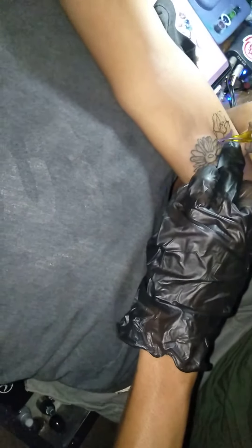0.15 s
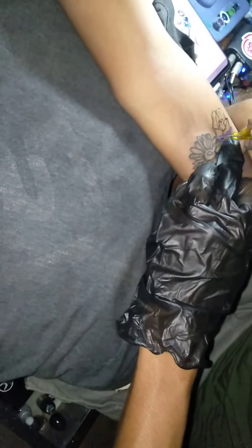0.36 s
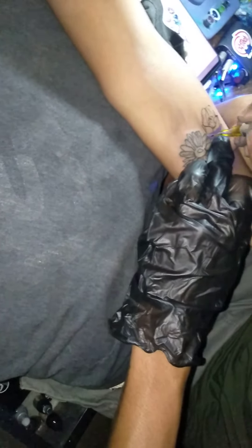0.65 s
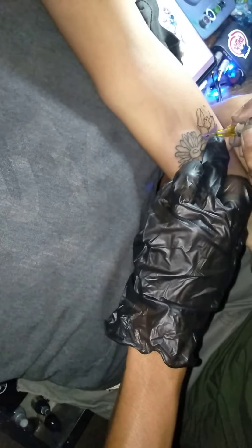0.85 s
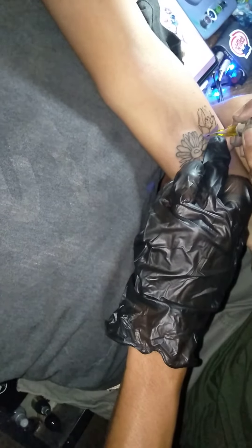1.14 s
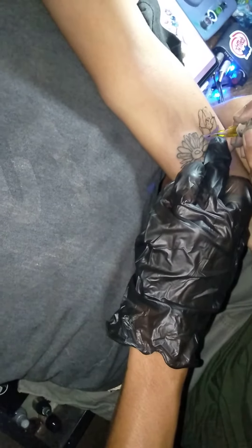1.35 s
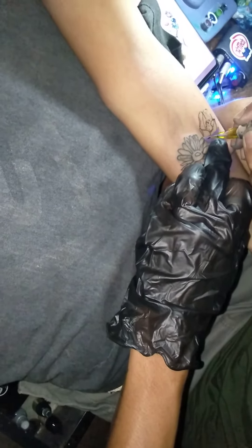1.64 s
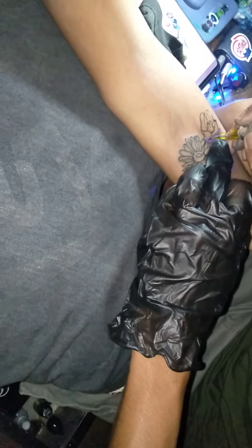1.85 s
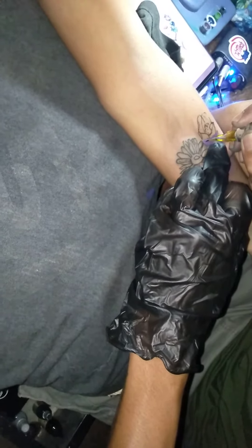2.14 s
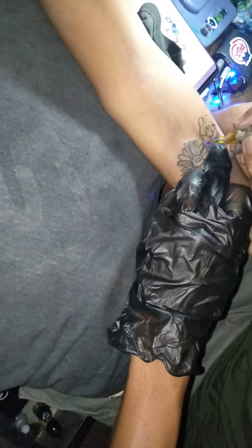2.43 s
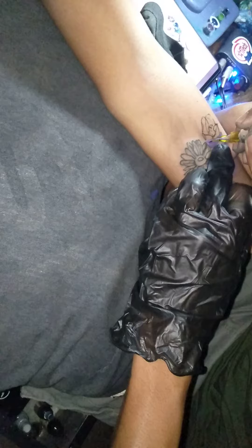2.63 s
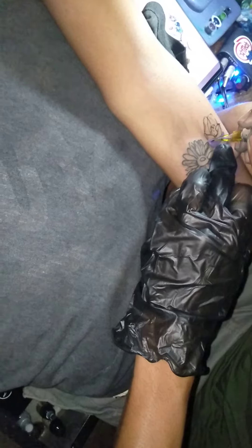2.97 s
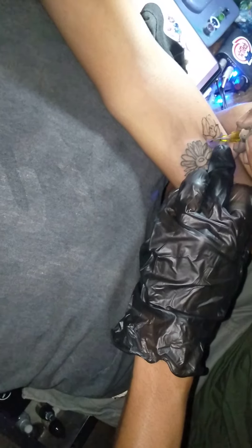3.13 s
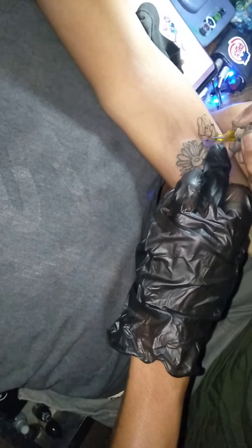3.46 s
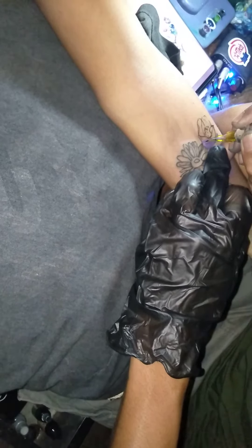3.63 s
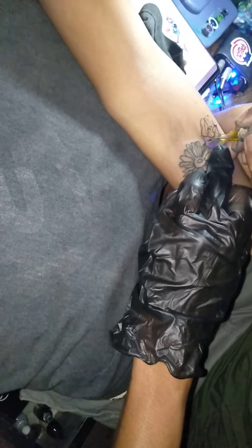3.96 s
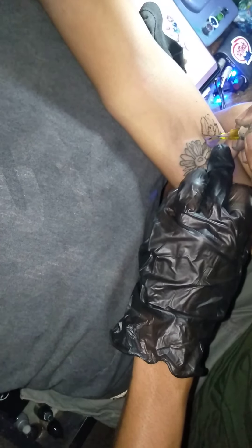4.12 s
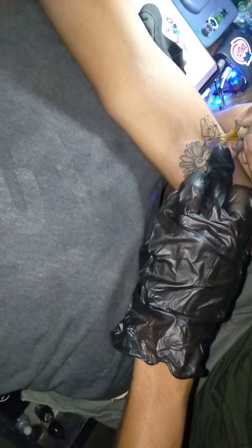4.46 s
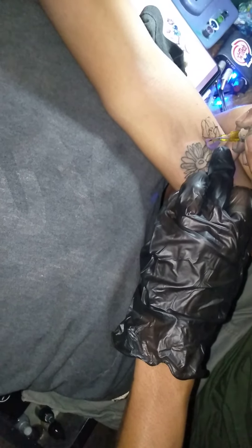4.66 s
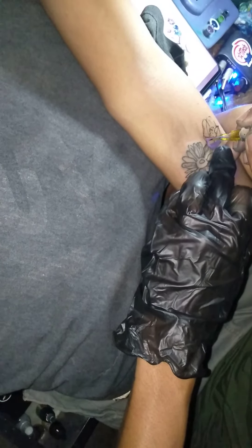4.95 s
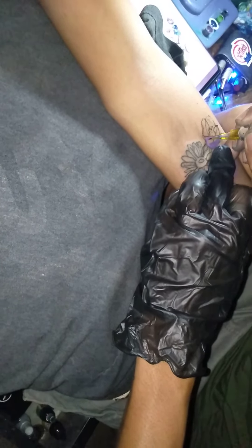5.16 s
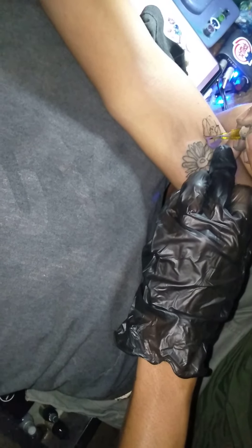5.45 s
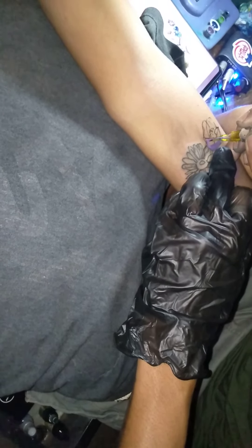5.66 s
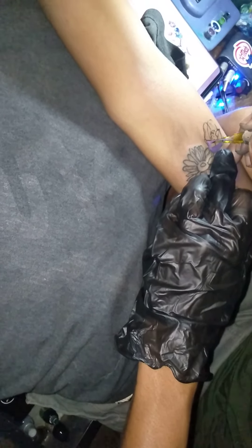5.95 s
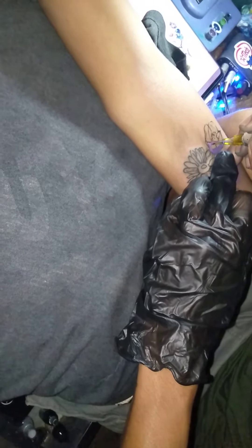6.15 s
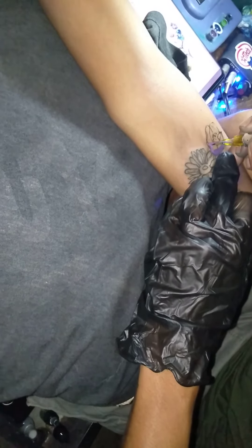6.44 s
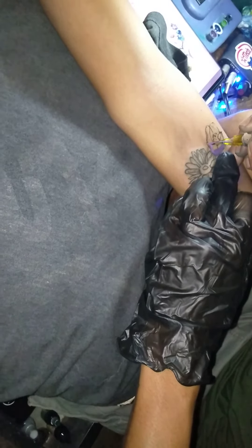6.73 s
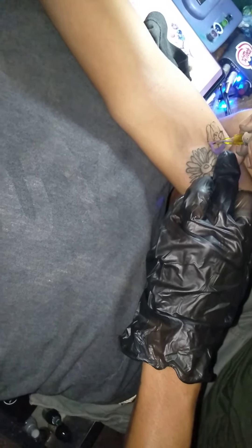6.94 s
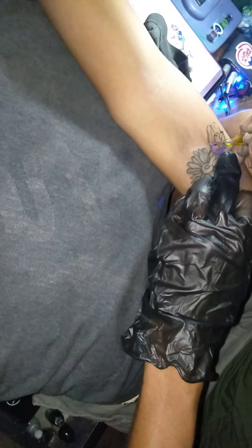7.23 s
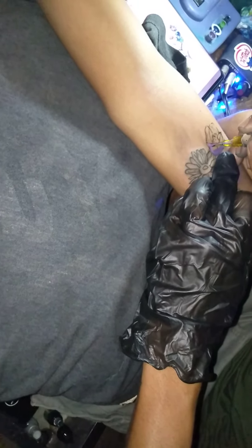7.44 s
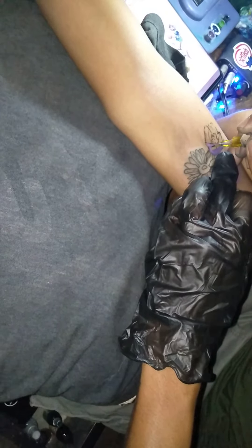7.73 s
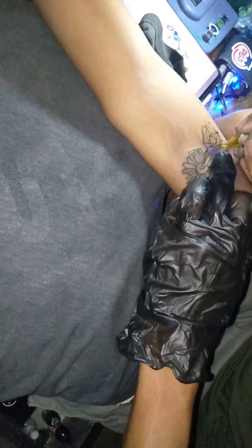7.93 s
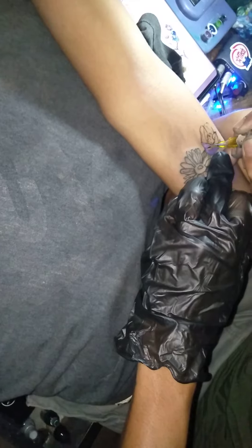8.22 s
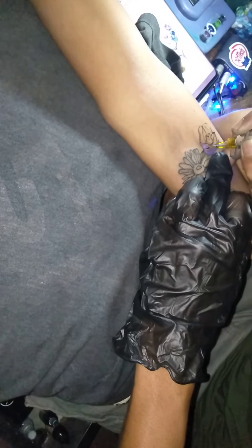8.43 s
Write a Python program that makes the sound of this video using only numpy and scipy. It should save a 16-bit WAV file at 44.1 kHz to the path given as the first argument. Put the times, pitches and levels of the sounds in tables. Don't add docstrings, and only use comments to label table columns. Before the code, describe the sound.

Close to a phone microphone in a small room, a coil tattoo machine gives a tiny burst, drops out while crickets chirp faintly, flutters weakly, then buzzes steadily at a low pitch with bright metallic chatter and electric sizzle. It sags and stutters just after five seconds, recovers stronger and runs to the end. A thin glove crackles occasionally.

```python
import sys
import numpy as np
from scipy import signal
from scipy.fft import rfft, irfft, next_fast_len
from scipy.io import wavfile
from scipy.ndimage import map_coordinates

SR = 44100
rng = np.random.default_rng(int(sys.argv[2]) if len(sys.argv) > 2 else 0)


def waveform_to_disk(signal):
    frames = np.transpose(np.atleast_2d(signal))
    scaled = np.clip(frames, -1, 1) * 32767
    samples = np.round(scaled).astype(np.int16)
    wavfile.write(sys.argv[1], SR, samples)


def voltage_ratio(decibels):
    exponent = np.asarray(decibels, float) / 20
    return 10 ** exponent


N = 378819
TIME = np.arange(N) / SR


def unit(x):
    return x / np.sqrt(np.mean(x ** 2) + 1e-20)


def along(points, hz):
    f, v = np.transpose(points)
    return np.interp(np.log(hz + 1), np.log(f + 1), v)


def curves(rows):
    s, *cols = np.transpose(rows)
    return [np.interp(TIME, s, c) for c in cols]


def wobble(rate):
    return map_coordinates(rng.standard_normal(int(N * rate / SR) + 4), [TIME * rate])


def filtered(x, response):
    m = next_fast_len(N + SR // 2)
    return irfft(rfft(x, m) * response(np.fft.rfftfreq(m, 1 / SR)), m)[:N]


def modes(table, flip=-1):
    def response(f):
        total = 0
        for k, (hz, width, db) in enumerate(table):
            total = total + flip ** k * voltage_ratio(db) * 1j * f * width / (hz * hz - f * f + 1j * f * width)
        return total
    return response


def small(f, edge_hz, order):
    return (1j * f / (edge_hz + 1j * f)) ** order


def noise(response):
    return unit(filtered(rng.standard_normal(N), response))


def pulses(times, sizes):
    at = np.clip(times * SR, 8, N - 9)
    taps = np.floor(at)[:, None] + np.arange(-7, 9)
    gap = taps - at[:, None]
    shape = np.sinc(gap) * np.cos(np.pi * gap / 16) ** 2
    return np.bincount(taps.astype(int).ravel(), (sizes[:, None] * shape).ravel(), N)


def armature():
    # start_s, strength_db, strokes_per_s
    pull = [(0.53, -33, 104.9), (0.64, -32, 105.1), (0.8, -34, 104.4), (1.47, -32, 104.7),
            (1.52, -34, 104.1), (2.55, -32, 104.5), (2.82, -34, 103.5), (2.93, -33, 104.3),
            (3.69, -32, 104.8), (4.41, -35, 103.6), (4.8, -33, 104.2), (5.18, -39, 101.9),
            (5.22, -45, 100.7), (5.29, -40, 102.1), (5.51, -38, 102.2), (5.78, -30, 105.1),
            (7.2, -33, 104.7), (8.59, -31, 105.1)]
    # on_s, off_s, strength_db
    switch = [(0, .097, -1), (.275, .322, -16), (.49, .516, -15), (.5168, 5.04, 0), (5.04, 5.12, -1.5),
              (5.12, 5.19, 0), (5.19, 5.23, -4), (5.23, 5.245, 4), (5.245, 5.28, -1), (5.28, 5.554, 0),
              (5.554, 5.563, -6), (5.563, 8.6, 0)]
    first_slam_s = .5172
    strength_db, speed = curves(pull)
    tremor_db = .6 * wobble(6)
    strength_db = strength_db + tremor_db
    turns = np.cumsum(speed + .3 * tremor_db + 0.1515 * wobble(25)) / SR
    turns += -turns[round(first_slam_s * SR)] % 1
    body_gain, chatter_gain = np.zeros(N), np.zeros(N)
    for on, off, current_db in switch:
        live = (TIME >= on) & (TIME < off)
        body_gain += live * voltage_ratio(strength_db - 18.5 + 1.3 * current_db)
        chatter_gain += live * voltage_ratio(strength_db + current_db)
    return turns, body_gain, chatter_gain


def travel_time():
    spread_ms = 1.201
    late = rng.random(40) * spread_ms / 1000

    def response(f):
        delay = np.interp(f, np.linspace(0, SR / 2, len(late)), late)
        return np.exp(-2j * np.pi * np.cumsum(delay) * f[1])
    return response


def slammed_body(turns, gain, travel):
    # pitch_hz, width_hz, level_db
    body_tones = [(441, 200, -19), (1025, 92, -8), (1405, 146, -10), (1772, 91, -20), (1998, 147, -17),
                  (2354, 143, -10), (2590, 56, -7), (2817, 42, -7), (3000, 78, 2), (3345, 278, -12),
                  (3606, 80, -3), (3901, 80, -9), (4351, 52, -8), (4890, 254, -15)]
    count = np.arange(1, int(turns[-1]))
    chance = rng.standard_normal((len(count), 2))
    times = np.interp(count, turns, TIME) + .009 * chance[:, 0] / 1000
    slams = pulses(times, voltage_ratio(.8 * chance[:, 1]))
    body_lags = 2.285
    return filtered(unit(slams) * gain * voltage_ratio(18.0),
                    lambda f: modes(body_tones, flip=1)(f) * small(f, 554, order=2) * travel(f) ** body_lags)


def contact_chatter(turns, gain, travel):
    # share_of_stroke, ring_db, sizzle_db, scatter_ms
    contacts = [(.0, 9.5, -2.5, 0.01), (.1, -4, -4, .015), (0.209, 6, -4, 0.018), (0.319, 2, -22, 0.025),
                (0.522, -38, 11, 0.033), (0.922, -17, -2, 0.038)]
    # pitch_hz, width_hz, level_db
    frame_tones = [(5170, 625, -3), (5969, 396, 1), (6507, 179, 4), (7154, 226, 1), (7669, 242, 2),
                   (7993, 231, 5), (8396, 683, 1), (9682, 939, -1), (10425, 282, 3), (11017, 204, 7),
                   (11930, 347, 5), (12461, 362, 4), (13493, 550, 4), (14468, 295, 9), (14854, 241, 12),
                   (15576, 365, 12)]
    # pitch_hz, level_db
    sizzle_colour = [(300, -30), (1000, 8), (2500, 25), (3500, 34.5), (4500, 12), (6000, -7), (10000, 0.5),
                     (15700, 3.5)]
    # start_s, end_s
    flutter = (.2, .516)
    burst_ms, steady_sizzle = 0.87, 0.53
    count = np.arange(1, int(turns[-1]))
    taps, sparks = np.zeros(N), np.zeros(N)
    for share, ring_db, sizzle_db, scatter_ms in contacts:
        chance = rng.standard_normal((len(count), 3))
        drift = .006 * wobble(2.5) * (share > 0)
        times = np.interp(count + share, turns + drift, TIME) + scatter_ms * chance[:, 0] / 1000
        taps += pulses(times, voltage_ratio(ring_db + 0.27 * chance[:, 1]))
        sparks += pulses(times, voltage_ratio(sizzle_db + 0.6 * chance[:, 2]))
    burst = np.exp(-TIME[:SR // 100] * 1000 / burst_ms)
    sparks = unit(np.abs(signal.fftconvolve(sparks, burst)[:N])) + steady_sizzle

    def steel(f):
        return modes(frame_tones)(f) * small(f, 4000, order=4)

    frame = filtered(unit(taps) * gain * voltage_ratio(0.5), lambda f: steel(f) * travel(f))
    sizzle = filtered(unit(sparks * rng.standard_normal(N)) * gain * voltage_ratio(-8.5),
                      lambda f: steel(f) * voltage_ratio(along(sizzle_colour, f)))
    weak = (TIME > flutter[0]) & (TIME < flutter[1])
    spring = filtered(weak * (frame + sizzle), lambda f: small(f, 11000, order=3))
    return ~weak * (frame + sizzle) + voltage_ratio(4) * spring


def machine():
    turns, body_gain, chatter_gain = armature()
    travel = travel_time()
    return slammed_body(turns, body_gain, travel), contact_chatter(turns, chatter_gain, travel)


def thinned(x):
    # before_slide_hz, after_slide_hz, width_hz, depth_0_to_1
    dead_spots = [(4260, 4250, 110, .97), (4660, 4870, 190, .99), (1650, 1580, 80, .8)]
    # start_s, end_s
    slide_span = (5.6, 6.2)

    def dip(f, end):
        return np.prod([1 - row[3] * modes([(row[end], row[2], 0)])(f) for row in dead_spots], axis=0)

    slid = np.interp(TIME, slide_span, (0, 1))
    return (1 - slid) * filtered(x, lambda f: dip(f, 0)) + slid * filtered(x, lambda f: dip(f, 1))


def crackles():
    # start_s, peak_db, low_hz, high_hz, high_against_low_db
    folds = [(0.351, -48.5, 430, 1150, -3), (.392, -57, 945, 1590, -8), (1.003, -40.5, 870, 1560, 3),
             (1.007, -39.5, 630, 804, -10), (1.026, -52, 500, 950, 3), (1.04, -52, 450, 800, 3),
             (1.061, -36, 1500, 2200, 0.5), (1.268, -48, 1800, 2120, 4), (1.624, -42, 1420, 1910, 3.5),
             (1.628, -46.5, 550, 1530, 5), (6.012, -48, 463, 1180, 3), (6.231, -47.5, 880, 1510, 5),
             (6.281, -46, 1224, 1920, 2), (7.688, -43, 1120, 1800, -10), (7.698, -38.5, 1190, 1930, -2),
             (7.749, -47, 1920, 2340, 1), (7.851, -49.5, 453, 1300, -3), (7.854, -47, 505, 800, -2)]
    fade_s, rise_s = 0.0093, 0.0008
    out, t = np.zeros(N + SR), TIME[:SR // 20]
    swell = voltage_ratio(-60 * t / fade_s) * (1 - np.exp(-t / rise_s))

    def tone(hz):
        return np.sin(2 * np.pi * hz * t)

    for s, db, low_hz, high_hz, high_db in folds:
        side = np.exp(0.15 * rng.standard_normal((2, 5, 1)))
        low = tone(low_hz) + 0.27 * tone(low_hz * side[0]).sum(axis=0)
        high = tone(high_hz) + 0.48 * tone(high_hz * side[1]).sum(axis=0)
        out[round(s * SR):][:len(t)] += voltage_ratio(db + 4.0) * swell * (low + voltage_ratio(high_db) * high)
    return out[:N]


def room(x):
    # pitch_hz, fade_s
    fade_times = [(200, 0.4), (2000, 0.3), (8000, 0.36), (12000, .3), (16000, 0.22)]
    hz, t, z = signal.stft(rng.standard_normal(SR // 2), SR, nperseg=256)
    tail = signal.istft(z * voltage_ratio(-60 * t / along(fade_times, hz)[:, None]), SR, nperseg=256)[1]
    return signal.fftconvolve(np.pad(x, (200, 0)), tail / np.linalg.norm(tail))[:N]


def crickets():
    # start_s, peak_db
    near_chirps = [(0.2508, -55), (0.2718, -53), (0.379, -56), (0.4015, -53), (.508, -56)]
    # pitch_hz, width_hz, level_db (rms)
    far_chorus = [(2580, 640, -67.5), (6200, 1600, -80)]
    swell = np.zeros(N)
    for s, db in near_chirps:
        since = TIME - s - .004
        swell += voltage_ratio(db) * np.exp(-np.abs(since) / np.where(since > 0, .014, .0025))
    out = voltage_ratio(-4) * swell * noise(lambda f: modes([(6350, 500, 0)])(f) ** 2)
    for hz, width, db in far_chorus:
        out += voltage_ratio(db + wobble(13)) * noise(lambda f: modes([(hz, width, 0)])(f) ** 2)
    return out


def background():
    # pitch_hz, level_db (per Hz)
    air_colour = [(12, -1), (20, -3), (130, -2), (291, -11.5), (430, -9.5), (653, -14), (913, -13.5),
                  (1690, -16), (2490, -19.5), (4480, -36), (6250, -8.5), (8270, -30), (15700, -17.5)]
    # peak_s, rise_s, fall_s, level_db
    handling = (8.23, 0.037, .8, 13.6)
    # pitch_hz, unsteadiness_hz, level_db (rms)
    hum_tones = [(103.9, 11.3, -66.5), (118.3, 2.3, -72), (233.5, 2.1, -81)]
    air = voltage_ratio(-59.5 - 2.0 + 0.93 * wobble(11)) * noise(lambda f: voltage_ratio(along(air_colour, f)))
    s, rise, fall, db = handling
    swell_db = db * np.exp(-np.abs(TIME - s) / np.where(TIME > s, fall, rise))
    rumble = voltage_ratio(-73 - wobble(4) + swell_db) * noise(lambda f: modes([(24, 40, 0)])(f) ** 2)
    hum = np.zeros(N)
    for hz, width, db in hum_tones:
        hum += voltage_ratio(db) * unit(np.sin(2 * np.pi * hz * TIME) + .7 * noise(modes([(hz, width, 0)])))
    return air + rumble + hum


def scene():
    body, chatter = machine()
    glove = crackles()
    wet = room(voltage_ratio(-12) * body + voltage_ratio(-5) * chatter + voltage_ratio(-12) * glove)
    return (thinned(body + chatter + wet) + glove + crickets() + background())[None]


def top_cut(x):
    return signal.sosfilt(signal.butter(12, 16970, fs=SR, output="sos"), x)


def record(dry):
    top_hz = 15740
    mix = filtered(dry[0], lambda f: f < top_hz)[None]
    return top_cut(mix)


dry = scene()
out = record(dry)
waveform_to_disk(out)
```